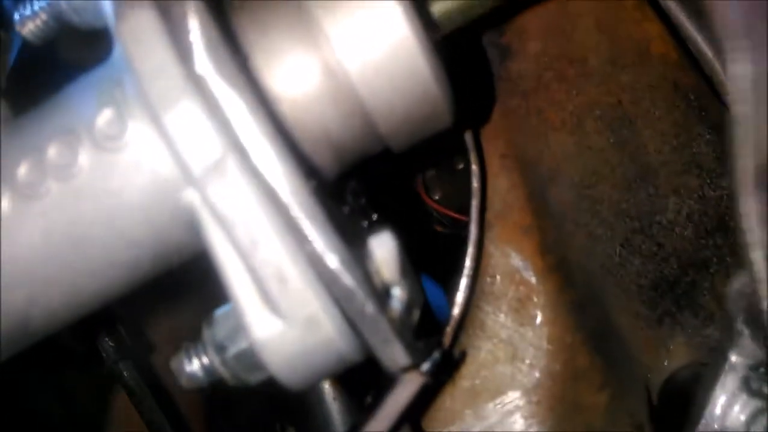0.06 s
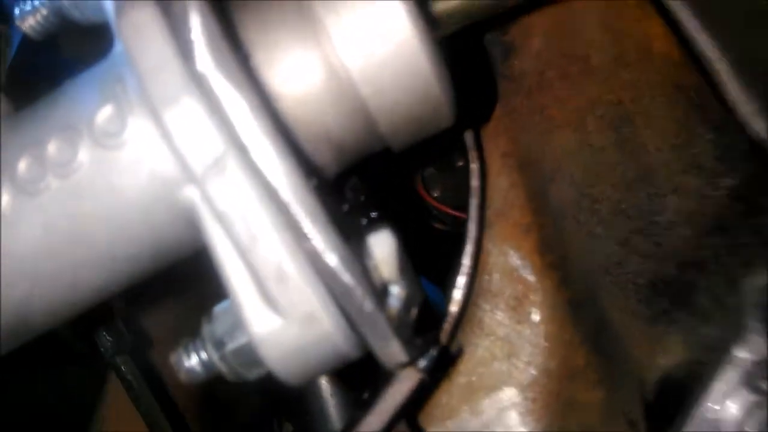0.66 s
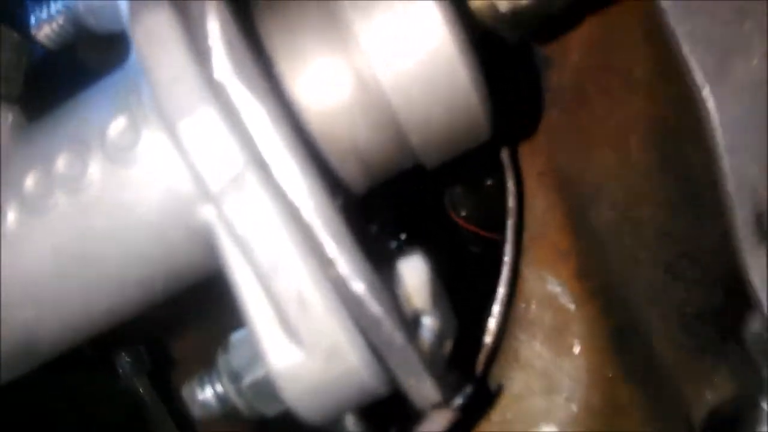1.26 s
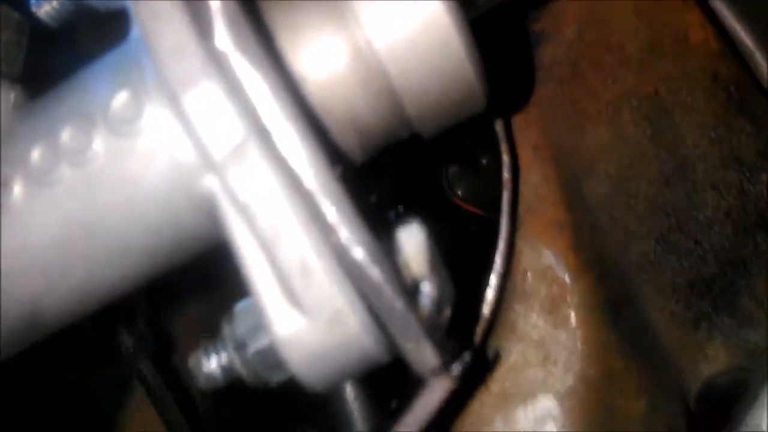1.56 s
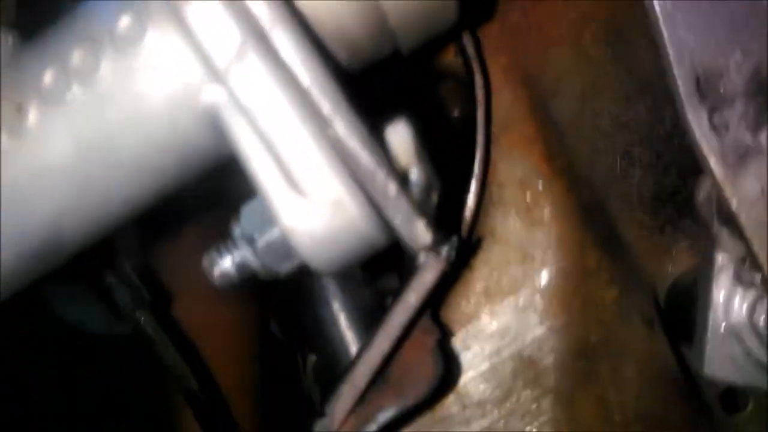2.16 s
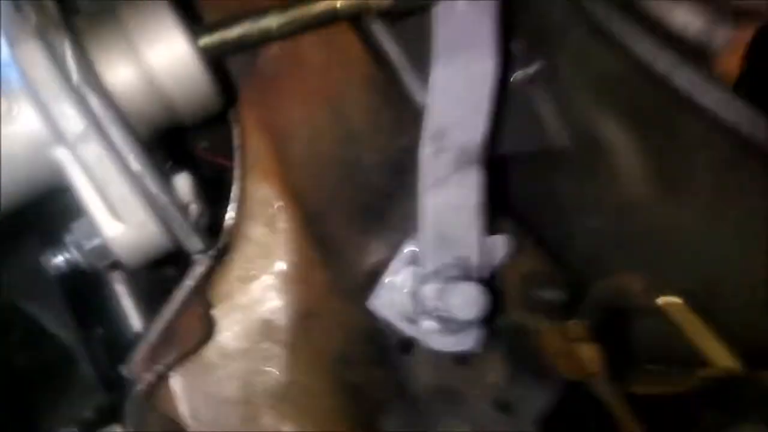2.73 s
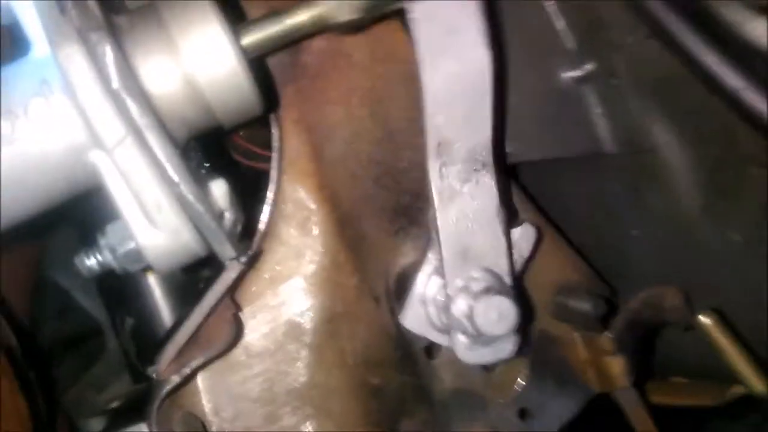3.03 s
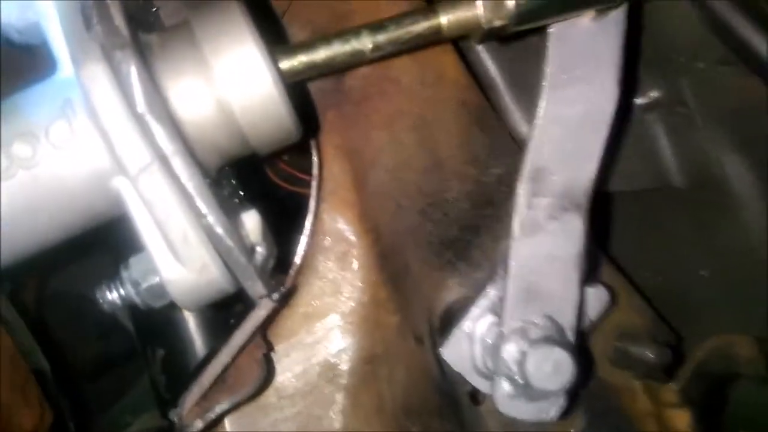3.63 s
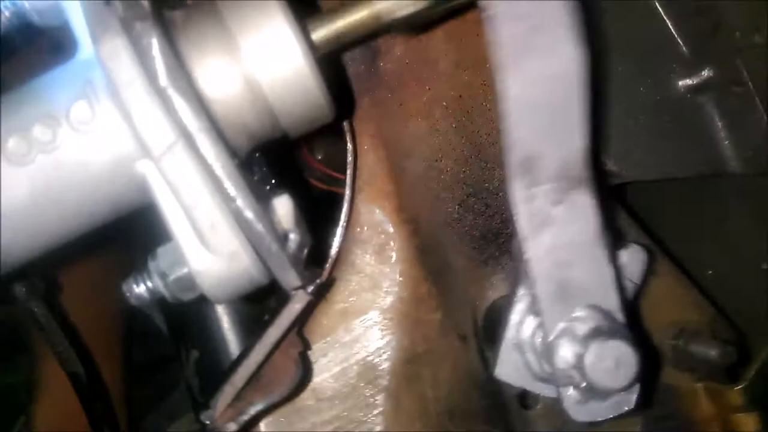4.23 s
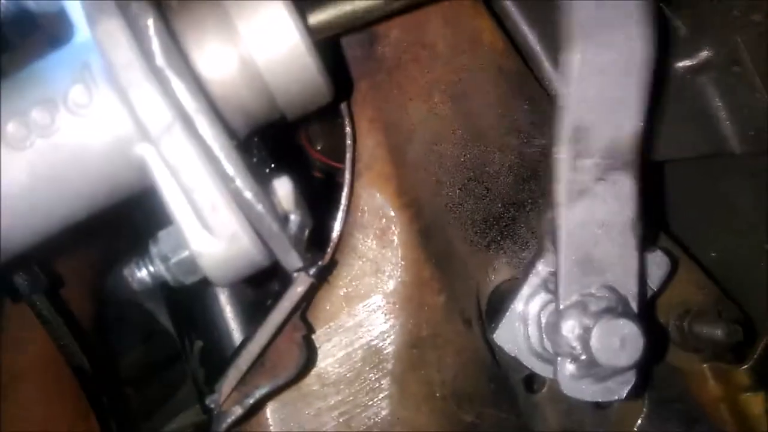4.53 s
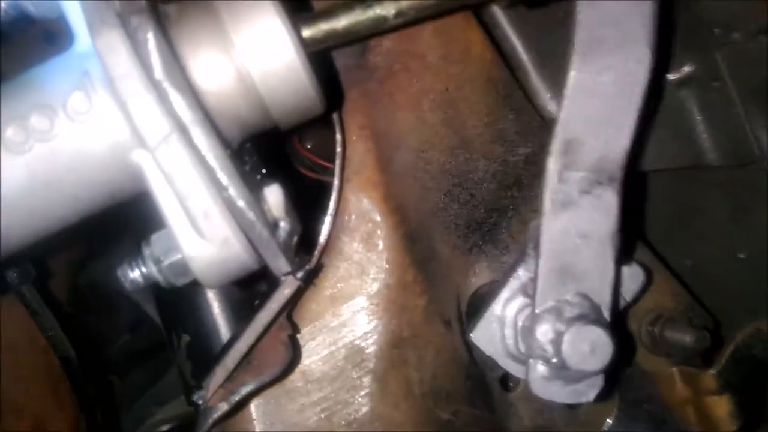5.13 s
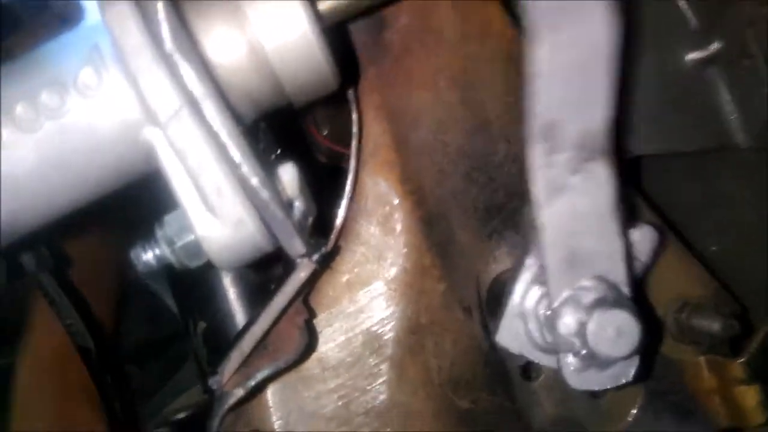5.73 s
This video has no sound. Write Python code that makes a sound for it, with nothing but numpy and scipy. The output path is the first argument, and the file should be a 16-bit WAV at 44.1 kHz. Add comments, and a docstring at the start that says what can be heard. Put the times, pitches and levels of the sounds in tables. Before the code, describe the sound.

A car clutch pedal is pumped repeatedly, with sharp metallic clicks, light clacks and dull low knocks from the linkage.

```python
"""A car's footwell, close to the clutch master cylinder: the pedal is pumped seven times.
On each stroke the piston seal rubs and squeaks, slack pins click, the push rod clacks,
and the pedal arm knocks on its stops. The knocks shake the firewall, which booms in the
small cabin; the return spring hums briefly after a quick release."""
import sys
import numpy as np
from scipy import signal
from scipy.fft import rfft, irfft, next_fast_len
from scipy.io import wavfile
from scipy.ndimage import map_coordinates

SR = 44100
rng = np.random.default_rng(int(sys.argv[2]) if len(sys.argv) > 2 else 0)


def waveform_to_disk(signal):
    """Save audio, clipped to [-1, 1], as 16-bit WAV at the path in sys.argv[1]."""
    frames = np.transpose(np.atleast_2d(signal))
    scaled = np.clip(frames, -1, 1) * 32767
    samples = np.round(scaled).astype(np.int16)
    wavfile.write(sys.argv[1], SR, samples)


N = 255109
TIME = np.arange(N) / SR
AGE = TIME[:SR // 3]  # s since a blow

# pedal going down: start_s, seal_db, bore_db, scrape_db, tight_spot_share, knock_db, clack_db
DOWNSTROKES = [(-.04, -27.5, -51, -47, 0.57, -66, -52.5), (0.923, -31, -52, -45.5, 0.52, -49, -61),
               (1.83, -29, -51.5, -46.5, 0.47, -46.5, -54), (2.928, -29, -48, -46.5, 0.53, -46.5, -46),
               (3.736, -27.5, -49, -44.5, 0.6, -47.5, -67), (4.489, -31, -49.5, -45.5, 0.53, -47, -47),
               (5.241, -27, -47, -44, 0.57, -48, -42)]
# pedal coming up: start_s, seal_db, bore_db, scrape_db, tight_spot_share, clack_db, click_db
UPSTROKES = [(0.417, -43.5, -50, -51.5, 0.33, -49, -54), (1.32, -42, -49, -54.5, 0.21, -47, -50.5),
             (2.288, -40, -46.5, -48, 0.81, -47.5, -53.5), (3.2998, -40.5, -50, -51.5, 0.37, -48, -47),
             (4.118, -39, -48, -47, 1, -47.5, -53.5), (4.833, -41, -49.5, -52, 0.34, -45.5, -50),
             (5.5738, -40, -49, -52, 0.24, -46.5, -48)]
# pedal on the floor stop:
# time_s, click_db, chatter_s, settle_s, clack_db, knock_db, ring_db, boom_db, boom_hz
FLOOR_HITS = [(0.1473, -31, 0.0028, 0.041, -66, -44.5, -57, -30, 100),
              (1.1196, -30, 0.00047, 0.037, -63, -43, -55.5, -31.5, 98),
              (2.039, -35, 0.00054, 0.024, -74, -60, -60, -33.5, 105),
              (3.1005, -32, 0.0013, 0.042, -66, -41.5, -56, -30, 98.8),
              (3.882, -28, 0.0067, .042, -31.5, -36.5, -36, -29, 115),
              (4.6603, -30.5, 0.0035, .044, -62, -41, -64, -27.5, 100),
              (5.3941, -30.5, 0.0051, 0.048, -33, -38.5, -40.5, -24, 100)]
# pedal on the top stop: time_s, click_db, chatter_s, bounce_s, clack_db, knock_db, ring_db
TOP_HITS = [(0.67, -29.5, 0.0023, .0045, -30.5, -40.5, -49),
            (1.5701, -27.5, 0.0041, 0.0025, -30, -42.5, -46.5),
            (2.483, -19.5, 0.0031, 0.0068, -31.5, -31, -35.5),
            (3.507, -22.5, 0.0029, 0.0046, -30, -32, -37.5), (4.317, -21.5, 0.0016, .004, -31, -31, -40),
            (5.064, -22.5, 0.0039, 0.0045, -28, -37.5, -60)]
# foot lifting off the floored pedal: time_s, level_db
FOOT_LIFTS = [(.373, -39.5), (1.276, -38), (2.244, -38), (3.263, -37), (4.801, -37.5), (5.53, -38.5)]
# pedal bracket modes: pitch_hz, level_db, t60_s
BRACKET_MODES = [(617, -1, 0.13), (775, -5, 0.21), (820, 11, 0.093), (848, -8, 0.08), (970, -4.5, 0.081),
                 (1060, -7, 0.052)]

ROD_LEAD_S, SLACK_LEAD_S = 0.0071, 0.004  # rod clack ahead of pin click
FIREWALL_HZ, JOLT_HOLD_S = 100, 0.0017


def undb(db):
    """Decibels to gain."""
    return 10 ** (np.asarray(db) / 20)


def colour(x, points):
    """Filter by (freq_hz, level_db) points on a log axis; 36 dB/octave roll-off outside."""
    hz, db = np.transpose(points)
    size = next_fast_len(x.shape[-1])
    f = np.maximum(np.fft.rfftfreq(size, 1 / SR), 1)
    octaves_outside = np.maximum(np.log2(hz[0] / f), 0) + np.maximum(np.log2(f / hz[-1]), 0)
    gain = undb(np.interp(np.log(f), np.log(hz), db) - 36 * octaves_outside)
    return irfft(rfft(x, size) * gain, size)[..., :x.shape[-1]]


def unit(x, span_s=None):
    """Scale to rms 1, over the first span_s if given."""
    return x / np.sqrt(np.mean(x[..., :int(span_s * SR) if span_s else None] ** 2))


def stereo_noise(size, apart):
    """Common noise plus reflections that each microphone hears alone."""
    common, left, right = rng.standard_normal((3, size))
    return unit(common + apart * np.array([left, right]))


def walk(rate_hz):
    """Random levels joined by straight lines; spread near 1."""
    levels = rng.standard_normal(4096)
    return 1.22 * np.interp(TIME * rate_hz, np.arange(len(levels)), levels)


def rise(rise_s):
    """Exponential onset of a blow."""
    return 1 - np.exp(-AGE / rise_s)


def fade(t60_s, rise_s, hold_s=0):
    """Blow envelope: rise, hold, decay."""
    return rise(rise_s) * np.exp(-np.log(1000) * np.maximum(AGE - hold_s, 0) / t60_s)


def release(end_s, t60_s):
    """Full level until end_s, then decay."""
    return np.exp(-np.log(1000) * np.clip((TIME - end_s) / t60_s, 0, 2))


def ring(modes, detune, spread_db=0, sharp=0):
    """Damped stereo modes, varied per blow; a hard blow starts them sharp by a share."""
    sag_s = 0.012
    hz, db, t60_s = np.transpose(modes)[:, :, None]
    mistune, vary_db, pan = rng.standard_normal((3, len(modes), 1))
    clock_s = AGE + sharp * sag_s * rise(sag_s)
    phase = np.float32(2 * np.pi * hz * (1 + detune * mistune) * clock_s)
    decay = np.exp(np.float32(-np.log(1000) * AGE / t60_s))
    gains = undb(db + vary_db + spread_db * np.hstack([pan, -pan]))
    return gains.T @ (np.sin(phase) * decay)


def struck(points, apart, fresh):
    """Densely resonant part: each call gives one noise pattern plus a fresh share."""
    noise, size = unit(colour(stereo_noise(SR * 2, apart), points)), len(AGE)

    def strike():
        start = rng.integers(size, SR * 2 - size)
        return (noise[:, :size] + fresh * noise[:, start:start + size]) / np.hypot(1, fresh)
    return strike


def add(out, time_s, sound):
    """Mix in a blow at time_s."""
    start = max(int(time_s * SR), 0)
    out[:, start:start + len(AGE)] += sound[..., :N - start]


def strokes(rising):
    """Per stroke in one direction: row, end_s, share of travel, friction build-up."""
    if rising:
        rows, lead_s, attack_s = UPSTROKES, 0.067, 0.18
        ends_s = [hit[0] for hit in TOP_HITS] + [5.8]  # last return has no hit
    else:
        rows, lead_s, attack_s = DOWNSTROKES, 0.049, 0.076
        ends_s = [hit[0] for hit in FLOOR_HITS]
    for (start_s, *row), end_s in zip(rows, ends_s):
        travel = np.clip((TIME - start_s) / (end_s - start_s), 0, 1)
        attack = np.clip((TIME - start_s + lead_s) / attack_s, 0, 1)
        yield row, end_s, travel, attack


def panel_rumble(booms):
    """Sheet metal rumbles with each stroke and jolt, over a faint steady hiss."""
    # spectra of the hiss and of low and upper panel flex: freq_hz, level_db
    hiss = [(200, -8), (1000, 12), (4000, -7), (10000, 2.5), (16000, -7.5)]
    low_flex = [(25, -46), (40, -8), (52, 3), (75, -1), (100, -3), (140, -1)]
    upper_flex = [(160, -8), (210, -6.5), (300, 7.5), (420, -8.5), (620, -13), (1200, -12)]
    out = undb(-64) * unit(colour(stereo_noise(N, apart=4.4), hiss))
    bands = (low_flex, -56, -47.5, -7, 0.7), (upper_flex, -63, -49.5, -14, 0.22)
    for spectrum, rest_db, moving_db, jolt_db, t60_s in bands:
        moving = sum(attack * release(end_s, t60_s)
                     for rising in (False, True) for _, end_s, _, attack in strokes(rising))
        jolts = np.zeros(N)
        for time_s, db, *_ in booms:
            jolts[int(time_s * SR)] += undb(db + jolt_db) ** 2
        jolt_power = signal.lfilter([1], [1, -np.exp(-2 * np.log(1000) / (t60_s * SR))], jolts)
        load = np.sqrt(undb(rest_db) ** 2 + (undb(moving_db) * moving) ** 2 + jolt_power)
        rumble = unit(colour(stereo_noise(N, apart=0.11), spectrum))
        out += rumble * load * undb(1.05 * np.tanh(walk(23)))
    return out


def spring_twangs():
    """The slack return spring hums after a quick release."""
    # spring hums: start_s, pitch_hz, level_db
    twangs = [(2.529, 243, -36.5), (3.557, 236.5, -33.5), (4.362, 239.3, -40), (5.084, 193, -39.5)]
    out = np.zeros((2, N))
    for start_s, hz, db in twangs:
        hum = np.sin(2 * np.pi * hz * AGE) * fade(t60_s=0.11, rise_s=0.0079, hold_s=0.019)
        add(out, start_s, undb(db) * unit(hum, 0.04))
    return out


def friction_levels():
    """Seal, bore and scrape gains: seal and scrape peak at a tight spot; scrape falls with depth."""
    seal, bore, scrape = 1e-6, undb(-79.5), undb(-74)  # creep between strokes
    tight_width_share = 0.16
    for rising, grip_db in ((False, 10.5), (True, 4.5)):
        for row, end_s, travel, attack in strokes(rising):
            seal_db, bore_db, scrape_db, tight_at, *_ = row
            tight = np.exp(-0.5 * ((travel - tight_at) / tight_width_share) ** 2)
            depth = 1 - travel if rising else travel
            seal_db += grip_db * (tight - 1.5)
            scrape_db += 3.5 * (tight - 1) - 5 * depth
            seal += attack ** 0.77 * release(end_s, t60_s=0.042) * undb(seal_db)
            bore += attack * release(end_s, t60_s=0.27) * undb(bore_db - 3.5)
            scrape += attack * release(end_s, t60_s=0.11) * undb(scrape_db)
    return seal, bore, scrape


def linkage_resonance(x, wander_db, drift):
    """Rod and cylinder resonances swell and shift in pitch as the contact moves."""
    # resonances: pitch_hz, width_hz, level_db
    peaks = [(829.7, 15, 9.5), (1074, 14, 2), (2026, 37, 6.5), (2353, 105, 9), (2710, 21, 11),
             (2950, 23, 12), (3440, 31, 7), (4027, 43, 6), (4320, 52, 6.5), (4620, 30, 8), (5096, 44, 9.5),
             (5500, 60, 4.5), (6610, 120, 10), (8140, 100, 4), (9440, 230, 5.5), (9900, 200, 5)]
    ringing = np.zeros_like(x)
    for hz, width_hz, db in peaks:
        band = signal.lfilter(*signal.iirpeak(hz, hz / width_hz, fs=SR), x)
        ringing += undb(db + wander_db * walk(17)) * band
    position = np.cumsum(1 + drift * walk(6))
    return np.array([map_coordinates(side, [position], order=3, mode="mirror") for side in x + ringing])


def rubbing():
    """The seal swishes along the bore in dense tiny slips; the rod scrapes in its guide."""
    # friction spectra: freq_hz, level_db
    seal_spectrum = [(5500, -12), (7000, -15), (8200, -8), (9500, -1.5), (10600, -7), (12000, -6),
                     (14000, -13), (16000, -20)]
    bore_spectrum = [(2900, -17), (3400, 2), (3800, 2), (4300, 0.5), (5400, -11), (6100, -14), (7200, -10),
                     (9000, -20)]
    scrape_spectrum = [(550, -8), (800, 8), (1050, 5), (1550, -0.5), (2000, 4), (2450, -1), (2800, -2),
                       (3100, -24.5), (4500, -4.5)]
    slip_rate_hz, slip_decay_s = 1200, 0.011
    seal, bore, scrape = friction_levels()
    slips = (rng.random(N) < slip_rate_hz / SR) * undb(5.3 * np.minimum(rng.exponential(size=N), 4))
    slip_power = signal.lfilter([1], [1, -np.exp(-1 / (slip_decay_s * SR))], slips ** 2)
    grain = unit(np.sqrt(slip_power))
    grip = walk(45)
    friction = linkage_resonance(stereo_noise(N, apart=1.0), wander_db=4.5, drift=0.02)
    seal *= grain * undb(1.5 * grip + 1.07 * walk(130) - 6)
    bore *= np.sqrt(grain) * undb(1.3 * grip - 3)
    scrape *= np.sqrt(grain) * undb(2.5 * walk(35) + 2 * walk(220) + 1.5)
    return (seal * unit(colour(friction, seal_spectrum))
            + bore * unit(colour(friction, bore_spectrum))
            + scrape * unit(colour(friction, scrape_spectrum)))


def seal_squeaks():
    """The seal breaks free of a tight spot with a short, high squeak."""
    # squeaks: start_s, pitch_hz, level_db, length_s
    squeaks = [(.029, 11500, -33.5, 0.0026), (0.056, 9200, -36.5, 0.0073), (0.49, 10200, -39.5, 0.0037),
               (0.527, 11100, -42, 0.0044), (1.0, 9600, -39, 0.0095), (1.022, 9700, -37, .007),
               (1.391, 10200, -42.5, 0.0093), (1.425, 10550, -36.5, 0.0032), (1.9, 10700, -41, 0.0025),
               (1.915, 9300, -36.5, 0.007), (1.933, 9600, -38, 0.014), (1.968, 10200, -39, 0.0077),
               (2.335, 10500, -48, .007), (2.375, 10200, -48, .008), (3.006, 9900, -44, 0.0094),
               (3.052, 9800, -44, 0.0089), (5.641, 9650, -42, 0.0056), (5.682, 9500, -45, 0.0065)]
    stage_width_hz = 1300
    out = np.zeros((2, N))
    for start_s, hz, db, length_s in squeaks:
        peak = signal.iirpeak(hz, hz / stage_width_hz, fs=SR)
        noise = stereo_noise(len(AGE), apart=0.3)
        squeal = unit(signal.lfilter(*peak, signal.lfilter(*peak, noise)))
        add(out, start_s, undb(db) * squeal * fade(t60_s=0.0069, rise_s=0.0015, hold_s=length_s))
    return out


def lift_knocks():
    """The unloaded pedal gives a soft, hollow knock as the foot lifts."""
    # unloaded pedal modes: pitch_hz, level_db, t60_s
    hollow_modes = [(158, 0.5, 0.13), (251, -2.5, 0.11), (299, 2, 0.11), (457, -13.5, 0.12)]
    out = np.zeros((2, N))
    swell = 1 - np.exp(-(AGE / 0.007) ** 2)
    for time_s, db in FOOT_LIFTS:
        knock = ring(hollow_modes, detune=0.041, spread_db=1.1) * swell
        add(out, time_s, undb(db - 1.5) * unit(knock, 0.04))
    return out


def firewall_booms(booms):
    """Jolts swing the firewall and cabin air; the load shifts the pitch."""
    # firewall and cabin modes: pitch_hz, level_db, t60_s
    cabin_modes = [(51.6, -12, 0.97), (100, 7, 0.77), (111, -18, 0.12), (145.8, 7.5, 0.1), (171, -3, 0.085)]
    out = np.zeros((2, N))
    for time_s, db, hold_s, pitch_hz in booms:
        modes = [(hz * pitch_hz / FIREWALL_HZ, mode_db, t60_s) for hz, mode_db, t60_s in cabin_modes]
        boom = ring(modes, detune=0.013) * fade(t60_s=0.27, rise_s=0.0086, hold_s=hold_s)
        add(out, time_s, undb(db) * unit(boom, 0.05))
    return out


def bracket_clangs():
    """Hard top stops make the steel bracket clang near the centre, sinking in pitch."""
    # clangs: start_s, level_db
    clangs = [(2.484, -28.5), (4.322, -36)]
    left_lead_s = 0.00055  # offsets the left microphone's lag
    out = np.zeros((2, N))
    for start_s, db in clangs:
        clang = ring(BRACKET_MODES, detune=0.0029, spread_db=1.0, sharp=0.046) * rise(0.0038)
        left, right = undb(db) * unit(clang, 0.04)
        add(out[:1], start_s - left_lead_s, left)
        add(out[1:], start_s, right)
    return out


def pedal_knocks(knocks):
    """The arm lands on a stop: its own dull modes plus the bracket's short ring."""
    # arm and bracket spectra: freq_hz, level_db
    body_spectrum = [(110, 8), (180, -6), (300, -1), (405, -10.5), (570, -12.5), (700, -17), (1200, -65)]
    plate_spectrum = [(450, -20), (620, -7.5), (830, 1), (1100, -3), (1350, -2), (1700, -12), (3000, -18)]
    # pedal arm modes: pitch_hz, level_db, t60_s
    arm_modes = [(171.4, -3, 0.32), (238, -2.5, 0.19), (299.4, 1, 0.18), (357.5, 6, 0.043), (394, 1, 0.12),
                 (453, -5, 0.3), (568.5, -0.5, 0.12)]
    out = np.zeros((2, N))
    body = struck(body_spectrum, apart=0.17, fresh=20)
    plate = struck(plate_spectrum, apart=2.06, fresh=0.83)
    thud = fade(t60_s=0.056, rise_s=0.00084, hold_s=0.0089) + undb(2) * fade(t60_s=0.72, rise_s=0.018)
    clank = fade(t60_s=0.12, rise_s=0.0071, hold_s=0.0042)
    swell = rise(0.0013)
    for time_s, body_db, ring_db in knocks:
        tilt_db_per_octave = 0.53 * (body_db + 35)  # gentle landing: longer push, quieter high modes
        modes = [(hz, db + tilt_db_per_octave * np.log2(hz / 300), t60_s) for hz, db, t60_s in arm_modes]
        arm = undb(-0.5) * unit(body() * thud)
        arm += unit(ring(modes, detune=0.0295, spread_db=0.18) * swell)
        steel = unit(plate() * clank)
        steel += undb(-7.5) * unit(ring(BRACKET_MODES, detune=0.0052, spread_db=3.2) * swell)
        add(out, time_s, undb(body_db) * unit(arm, 0.04) + undb(ring_db + 2) * unit(steel, 0.04))
    return out


def rod_chirps():
    """The rod end judders in its socket: a tone that swells and is choked as it seats."""
    # judders: peak_s, pitch_hz, peak_db
    chirps = [(.668, 2760, -24), (1.568, 2580, -27), (1.7233, 1950, -29.5), (2.4793, 2020, -12.5),
              (2.7125, 2360, -26.5), (3.5055, 2620, -20), (3.613, 2570, -31), (3.885, 2250, -18),
              (4.3145, 2070, -14.5), (4.394, 2520, -30), (5.0598, 2600, -17), (5.151, 2380, -38),
              (5.4, 2250, -20.5)]
    lead_s, swell_s, choke_s = 0.02, 0.0015, 0.00083
    out = np.zeros((2, N))
    t = AGE - lead_s
    envelope = np.exp(np.minimum(t, 0) / swell_s - (np.maximum(t, 0) / choke_s) ** 2)
    for peak_s, hz, db in chirps:
        add(out, peak_s - lead_s, undb(db) * envelope * np.sin(2 * np.pi * hz * t))
    return out


def rod_clacks(clacks):
    """The push rod grazes its socket, then seats with a clack that the panels carry on."""
    # panel spectrum: freq_hz, level_db
    panel_spectrum = [(700, 7), (1200, 5), (1400, 4.5), (1600, -0.5), (2020, 10), (2300, 7.5), (2700, 4.5),
                      (3100, 1.5), (3800, -2), (6000, -16)]
    # push rod modes: pitch_hz, level_db, t60_s
    rod_modes = [(1386, -13, 0.039), (2086, 11, 0.021), (2100, -5.5, 0.033), (2250, -9, 0.0213),
                 (2540, 30, 0.029), (2580, -14, 0.11)]
    out = np.zeros((2, N))
    panels = struck(panel_spectrum, apart=1.0, fresh=1.0)
    graze = fade(t60_s=0.076, rise_s=0.003, hold_s=0.0036)
    seat = fade(t60_s=0.0023, rise_s=0.0012, hold_s=0.0062)
    seat += fade(t60_s=0.066, rise_s=0.007, hold_s=0.015)
    for time_s, db in clacks:
        add(out, time_s - 0.005, undb(db - 4.5) * unit(panels() * graze, 0.065))
        clack = unit(panels() * seat)
        clack += undb(-6) * unit(ring(rod_modes, detune=0.004, spread_db=5.7) * rise(0.00021))
        add(out, time_s, undb(db) * unit(clack, 0.02))
    return out


def pin_clicks(clicks):
    """Steel pins snap across their play: spike, chatter, footwell reflections, ringing steel."""
    # click spectra: freq_hz, level_db
    bright_spectrum = [(5500, -25), (7000, 0), (7600, -7), (8050, 8), (8600, 4), (9000, 9.5), (10300, 2),
                       (11500, -2.5), (13000, -8), (15300, -12.5), (16000, -26)]
    dull_spectrum = [(1500, -11), (2800, -10.5), (3200, -4.5), (3800, 3.5), (4400, 6), (5300, 2),
                     (6300, 0.5), (7500, 1.5), (9500, -12.5)]
    # modes of the clevis and of the rod's thin, lasting ring: pitch_hz, level_db, t60_s
    clevis_modes = [(3090, -10.5, 0.11), (4045, -17.5, 0.072), (4500, -2, 0.045), (5320, -13, 0.012),
                    (8073, 15, 0.02), (8700, 5.5, 0.011), (10500, 16, 0.079)]
    rod_modes = [(2990, 8, 0.45), (4000, -4, 0.13), (7070, -4.5, 0.93)]
    out = np.zeros((2, N))
    bright = struck(bright_spectrum, apart=0.96, fresh=1.0)
    dull = struck(dull_spectrum, apart=1.0, fresh=2.6)
    rod = undb(-37.5) * ring(rod_modes, detune=0)
    reflections = undb(-24.5) * fade(t60_s=0.24, rise_s=0.004)
    for time_s, db, dull_db, chatter_s in clicks:
        rise_s = 0.0001 + 0.22 * chatter_s
        snap = undb(10.5) * np.exp(-chatter_s / 0.0035)  # clean contact, hard spike
        spike = snap * fade(t60_s=0.026, rise_s=rise_s, hold_s=chatter_s)
        chatter = fade(t60_s=0.057, rise_s=rise_s, hold_s=chatter_s)
        click = (bright() + undb(dull_db) * dull()) * (spike + chatter + reflections)
        clevis_db = -9 - 0.63 * max(db + 28, 0)  # a hard click presses the clevis tight
        clevis = unit(ring(clevis_modes, detune=0.0047, spread_db=8.1) * rise(0.00062), 0.016)
        add(out, time_s, undb(db) * (unit(click, 0.02) + undb(clevis_db) * clevis + rod))
    return out


def slack_blows():
    """The unloaded linkage drops back with a dull clack; its pins snap home or slip."""
    # rebounds: time_s, click_db, dull_db, chatter_s, clack_db, knock_db, snap_s, snap_db
    rebounds = [(0.782, -58, 17, 0.0042, -46, -51.5, .8273, -33.5),
                (1.7284, -42.5, 13, 0.0012, -40.5, -48.5, 1.7713, -32),
                (2.7158, -27, -1, 0.0047, -35.5, -43.5, 2.76, -34.5),
                (3.6157, -33.5, 11, 0.011, -41, -42.5, 3.662, -33.5),
                (4.3984, -29.5, -1.5, 0.0037, -37.5, -50, 4.4418, -33),
                (5.153, -35, 7, 0.015, -38.5, -46.5, 5.1989, -32)]
    # stray pin clicks: time_s, level_db, dull_db, chatter_s
    pin_slips = [(.135, -49, -12, 0.0026), (.398, -60, -20, .002), (.638, -51, -14, .003),
                 (0.658, -40.5, 2, 0.00089), (0.8064, -46, 14, 0.0017), (1.105, -52, -14, .003),
                 (1.207, -57.5, 6, 0.0053), (1.5573, -39, 5, 0.00061), (1.741, -51, -4, 0.0028),
                 (2.02, -54, -13, .003), (2.265, -60, -16, .003), (2.468, -56, -8, .002),
                 (2.74, -58, 0, 0.0036), (2.798, -55, 8, .004), (2.874, -55, -10, .006),
                 (3.1853, -51, 4, 0.0064), (4.645, -46, -7, 0.0023), (4.754, -52.5, 2, 0.0064),
                 (5.037, -40, -12, 0.0005)]
    for time_s, click_db, dull_db, chatter_s, clack_db, knock_db, snap_s, snap_db in rebounds:
        yield "clack", time_s - SLACK_LEAD_S, clack_db
        yield "knock", time_s - SLACK_LEAD_S, knock_db, knock_db - 7
        yield "boom", time_s, knock_db + 4.5, JOLT_HOLD_S, FIREWALL_HZ
        yield "click", time_s, click_db, dull_db, chatter_s
        yield "click", snap_s, snap_db - 0.5, -4.5, 0.00089
        yield "boom", snap_s, -49, JOLT_HOLD_S, FIREWALL_HZ
        yield "clack", snap_s - ROD_LEAD_S, snap_db - 19.5
    for row in pin_slips:
        yield "click", *row


def return_blows():
    """Pedal up: the foot lifts, slack changes sides, the arm wobbles and hits the top stop."""
    # arm shifting on its pivot: time_s, level_db
    wobbles = [(0.276, -59.5), (.585, -46.5), (1.479, -47.5), (2.43, -43.5), (3.445, -44.5), (4.262, -44),
               (4.987, -48.5), (5.718, -45), (5.741, -44)]
    # arm landing again after a hard stop: time_s, knock_db, ring_db
    arm_bounces = [(2.497, -44, -46.5), (3.522, -48, -63), (3.893, -37.5, -51), (4.333, -48, -62)]
    # firewall swinging back: time_s, level_db, pitch_hz
    sways = [(0.73, -53, 100), (2.493, -31, 96), (2.567, -33, 89), (2.619, -36, 94), (3.53, -40, 119.6),
             (3.606, -36.5, 111.6), (4.339, -33, 102), (5.07, -37.5, 100)]
    jerk_gap_s = 0.011
    for time_s, db in FOOT_LIFTS:
        yield "boom", time_s, db - 5, JOLT_HOLD_S, FIREWALL_HZ
        yield "knock", time_s + 0.00432, db - 10.5, db - 22.5
        yield "clack", time_s, db - 16
    for time_s, *_, clack_db, click_db in UPSTROKES:
        yield "clack", time_s, clack_db
        yield "click", time_s + SLACK_LEAD_S, click_db, 2, 0.0045
    for time_s, db in wobbles:
        yield "knock", time_s, db, db - 6
        for jerk in range(3):
            yield "clack", time_s + jerk * jerk_gap_s, db - 8 - 4 * jerk
    for time_s, click_db, chatter_s, bounce_s, clack_db, knock_db, ring_db in TOP_HITS:
        yield "clack", time_s - 0.003, clack_db
        yield "knock", time_s - 0.0035, knock_db, ring_db
        yield "click", time_s, click_db, -3.3, chatter_s
        yield "click", time_s + bounce_s, click_db - 3.5, -3, 0.001
        yield "boom", time_s + 0.00077, knock_db + 0.5, JOLT_HOLD_S, FIREWALL_HZ
    for row in arm_bounces:
        yield "knock", *row
    for time_s, db, hz in sways:
        yield "boom", time_s, db, JOLT_HOLD_S, hz


def press_blows():
    """Pedal down: the rod takes load, the arm hits the floor, the pin settles, loose parts rattle."""
    # rattles after a hard push: time_s, click_db, clack_db, boom_db
    rattles = [(3.9043, -35.5, -37.5, -57), (3.9514, -42.5, -44, -32.5), (4.0125, -42.5, -47.5, -35),
               (5.454, -45.5, -50.5, -67), (5.517, -38.5, -46, -33.5)]
    floor_hold_s, rattle_gap_s = 0.04, 0.02
    for time_s, *_, knock_db, clack_db in DOWNSTROKES:
        yield "clack", time_s, clack_db
        yield "knock", time_s, knock_db, knock_db - 7
        yield "click", time_s + ROD_LEAD_S, clack_db, -1, 0.007
    for hit in FLOOR_HITS:
        time_s, click_db, chatter_s, settle_s, clack_db, knock_db, ring_db, boom_db, boom_hz = hit
        yield "click", time_s, click_db + 1, -4.5, chatter_s
        yield "clack", time_s + 0.00273, clack_db
        yield "knock", time_s, knock_db, ring_db
        yield "boom", time_s, boom_db, floor_hold_s, boom_hz
        yield "click", time_s + settle_s, click_db - 19.5, 2.5, 0.008
        for turn in range(1, 4):
            rattle_s = time_s + turn * rattle_gap_s + rng.uniform(-0.0055, 0.0038)
            yield "clack", rattle_s, click_db - 31.5 + 3 * turn
    for time_s, click_db, clack_db, boom_db in rattles:
        yield "click", time_s, click_db, -1.2, 0.005
        yield "clack", time_s - SLACK_LEAD_S, clack_db
        yield "boom", time_s, boom_db, 0.02, FIREWALL_HZ


def scene():
    """Route each blow (kind, time_s, level_db, ...) to its part and mix all layers."""
    blows = {"click": [], "clack": [], "knock": [], "boom": []}
    for kind, *blow in (*press_blows(), *return_blows(), *slack_blows()):
        blows[kind].append(blow)
    pins = undb(-0.5) * pin_clicks(blows["click"])
    rod = undb(-3.5) * rod_clacks(blows["clack"]) + rod_chirps()
    pedal = undb(2.5) * pedal_knocks(blows["knock"]) + lift_knocks() + bracket_clangs()
    firewall = undb(-0.5) * firewall_booms(blows["boom"])
    friction = rubbing() + seal_squeaks()
    return pins + rod + pedal + firewall + friction + spring_twangs() + panel_rumble(blows["boom"])


def record(dry):
    """Band-limited phone microphones: the right faces the linkage, the left is later and duller."""
    # left minus right: freq_hz, level_db
    balance = [(60, 2), (110, 0), (200, -1.5), (380, 0), (700, -2.5), (1290, -0.5), (2380, 2.5),
               (4400, 0.5), (8120, -11.5), (15000, -11)]
    left_lag_s, low_cut_hz, high_cut_hz = 0.00037, 34.4, 16100
    hz, lean_db = np.transpose(balance)
    mean_db = 10 * np.log10((1 + 10 ** (lean_db / 10)) / 2)
    grid_hz = np.r_[1, hz, SR]
    left = colour(dry[0], np.c_[grid_hz, np.pad(lean_db - mean_db, 1, "edge")])
    right = colour(dry[1], np.c_[grid_hz, np.pad(-mean_db, 1, "edge")])
    mics = np.array([np.pad(left, (int(left_lag_s * SR), 0))[:N], right])
    mics = signal.sosfilt(signal.butter(3, low_cut_hz, "high", fs=SR, output="sos"), mics)
    return signal.sosfilt(signal.ellip(8, 0.2, 70, high_cut_hz, fs=SR, output="sos"), mics)


dry = scene()
out = record(dry)
waveform_to_disk(out)
```